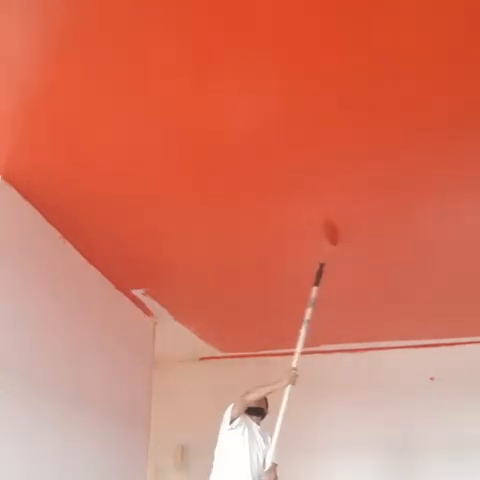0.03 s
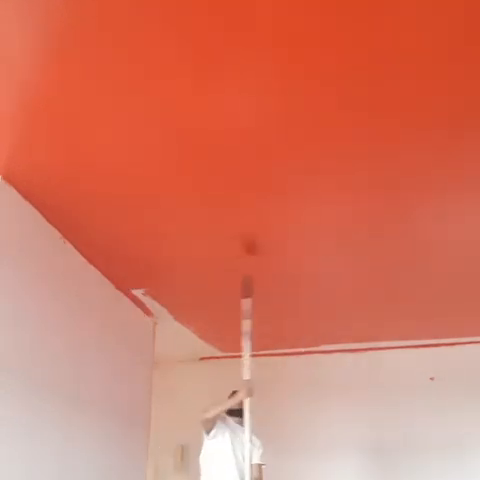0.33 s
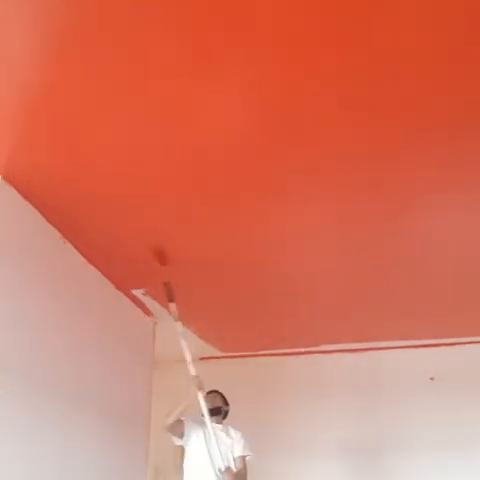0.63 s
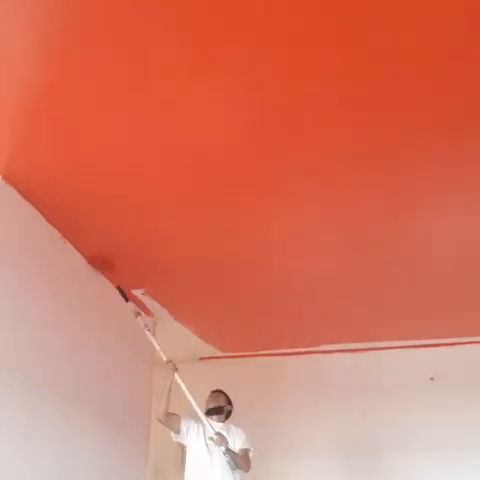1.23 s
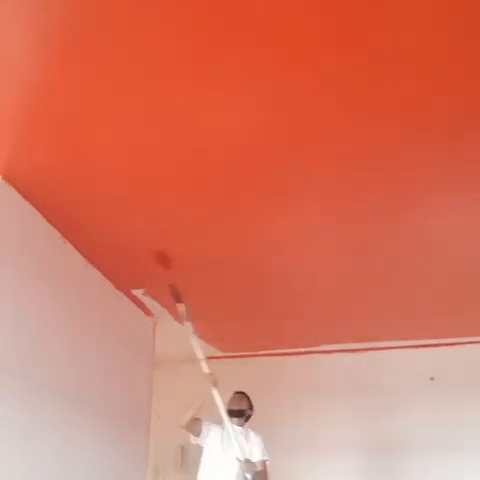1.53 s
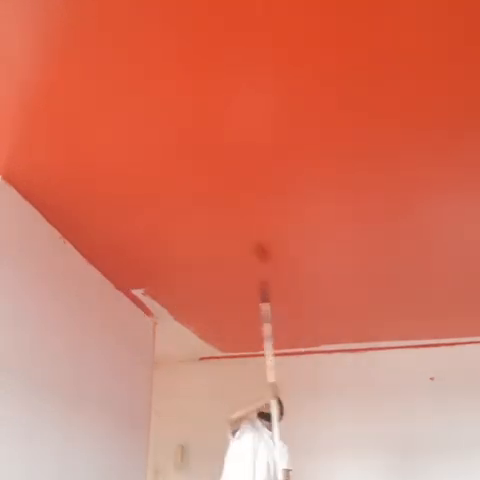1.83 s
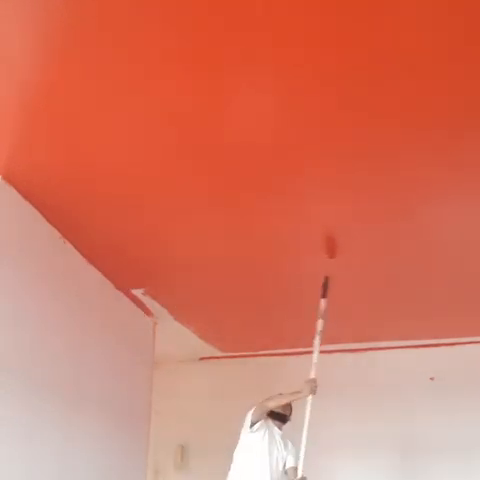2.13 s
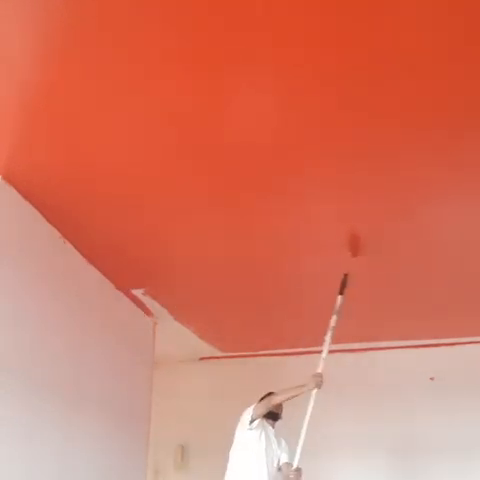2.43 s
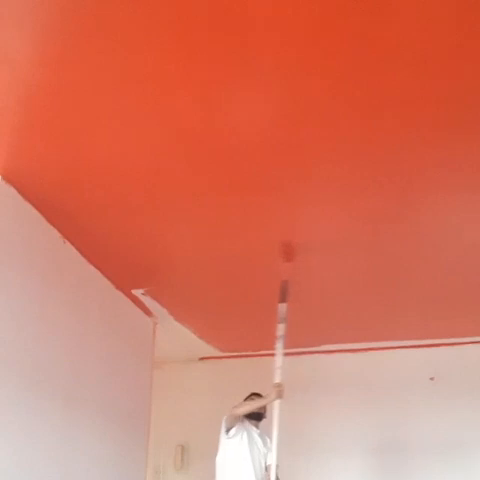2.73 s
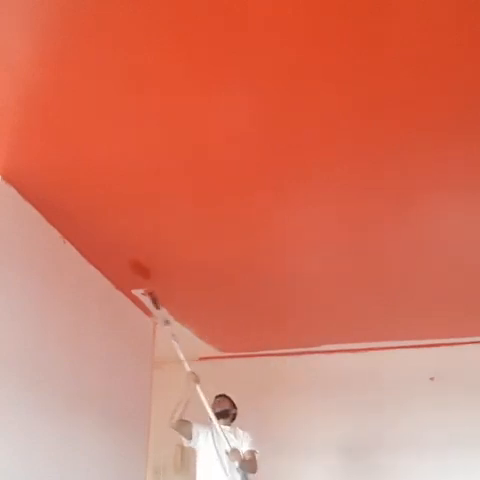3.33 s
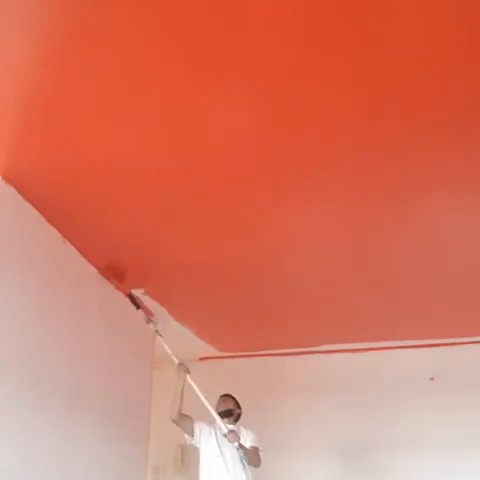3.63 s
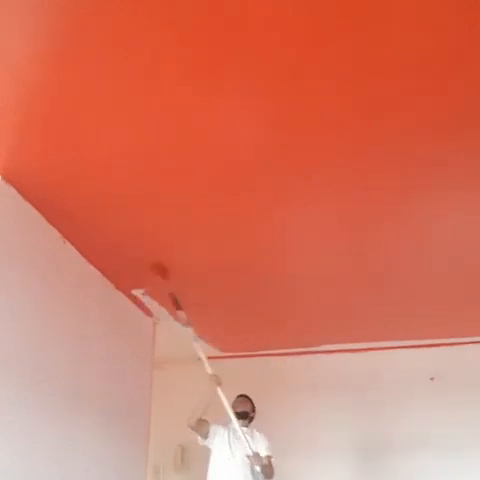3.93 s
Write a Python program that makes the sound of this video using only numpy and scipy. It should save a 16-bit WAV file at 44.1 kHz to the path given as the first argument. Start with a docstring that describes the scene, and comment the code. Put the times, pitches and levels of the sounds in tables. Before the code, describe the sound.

Wet paint roller rolling back and forth, with a sticky hiss and low rumble indoors.

```python
"""Paint roller on a ceiling

A wet roller on a long pole sweeps to and fro in a bare, ringing room. Its nap peels off the
tacky paint in countless tiny snaps that merge into a hiss, and scrubs when pushed hard.
The core rumbles against the ceiling; the pole drones. At each turn the roller sinks, the room rings on."""
import sys
import numpy as np
from scipy import signal
from scipy.fft import rfft, irfft, next_fast_len
from scipy.io import wavfile
from scipy.ndimage import uniform_filter1d, map_coordinates

SR = 44100
rng = np.random.default_rng(int(sys.argv[2]) if len(sys.argv) > 2 else 0)


def unload_audio(sound):
    """Save the sound as a 16-bit wav file, at the path given as the first command line argument."""
    columns = np.transpose(np.atleast_2d(sound))
    # keep every value between -1 and 1, then stretch to whole-number steps
    steps = np.round(np.clip(columns, -1, 1) * 32767)
    wavfile.write(sys.argv[1], SR, steps.astype(np.int16))


N = 176400

# Nap peeling, dips at the turns (time [s], level [dB])
PEEL_LEVEL = [(0, -44.5), (.17, -55.5), (.32, -48.5), (.6, -41.5), (.74, -41), (.92, -43), (1.24, -46.5),
              (1.35, -57.5), (1.5, -56.5), (1.67, -45), (1.8, -46), (1.91, -48), (2.14, -45.5), (2.48, -50),
              (2.64, -61.5), (2.74, -54.5), (2.95, -45), (3.14, -41.5), (3.42, -43.5), (3.57, -43),
              (3.73, -44), (3.85, -55), (4, -60.5)]
# Finest treble, quickest to start and stop (time [s], level [dB])
FIZZ_LEVEL = [(0, -59), (.1, -65), (.16, -72), (.22, -61.5), (.36, -55.5), (.68, -52.5), (1.25, -60),
              (1.35, -71.5), (1.43, -65), (1.56, -63.5), (1.65, -53.5), (1.94, -61), (2.0, -57),
              (2.15, -57), (2.49, -63), (2.63, -73), (2.72, -62), (3.05, -55), (3.19, -55), (3.42, -59),
              (3.59, -54.5), (3.74, -61.5), (3.83, -69.5), (4, -72)]
# Core rolling (time [s], level [dB])
ROLL_LEVEL = [(0, -51), (.12, -56.5), (.28, -59), (.42, -50.5), (.6, -48), (1.14, -56), (1.33, -62.5),
              (1.52, -59.5), (1.79, -48), (2.05, -46), (2.35, -56), (2.6, -66), (2.75, -61), (2.98, -48),
              (3.18, -50.5), (3.4, -53.5), (3.6, -52.5), (3.85, -61.5)]
# Sweeps to the right (start [s], end [s])
RIGHT_SWEEPS = [(-.5, .16), (1.48, 2.4)]
# Hard mid-stroke pushes (peak time [s], level [dB], rise [s], fall [s])
PUSH_PEAKS = [(.66, -43.5, .15, 0.095), (2.04, -45, 0.29, 0.34), (3.07, -45.5, 0.19, 0.18),
              (3.72, -56, 0.063, 0.068)]

# Peeling hiss (frequency [Hz], relative density [dB])
HISS_SPECTRUM = [(400, -31), (900, -22.5), (1250, -7), (1700, -8.5), (2400, -2), (2830, -2), (3700, 0),
                 (4150, 0.7), (5000, -2.5), (5900, -8), (7200, -13), (7800, -22), (8400, -27), (11000, -34)]
# Coarse rub (frequency [Hz], relative density [dB])
RUB_SPECTRUM = [(400, -38), (800, -12.5), (1200, -3.5), (1600, 3.5), (2200, -3.5), (2800, -15.5),
                (4000, -13), (8000, -33)]
# Fine fizz (frequency [Hz], relative density [dB])
FIZZ_SPECTRUM = [(3000, -49), (6000, -2), (7400, -1), (8400, -13), (9300, -8.5), (10300, -6.5), (12000, -7),
                 (14000, -4), (15800, -2.5)]
# Core on plaster (frequency [Hz], relative density [dB])
RUMBLE_SPECTRUM = [(40, -36), (70, -18), (130, -11), (260, -2.5), (400, -1), (495, 1.5), (600, 1), (710, 0),
                   (900, -1), (1250, -5), (2200, -10.5), (3500, -12), (7000, -52)]
# Ring of the hollow core (frequency [Hz], relative density [dB])
HOLLOW_SPECTRUM = [(250, -30), (400, -6), (495, -1), (600, -4), (710, -1), (850, -6.5), (1300, -27)]
# Pole drone (frequency [Hz], relative density [dB])
DRONE_SPECTRUM = [(20, -34), (40, -42), (54, -29), (90, -4.5), (120, -2), (180, -1), (270, -1), (340, -3),
                  (600, -11), (1200, -13.5), (2000, -8), (4000, -31.5)]
# Nap scrubbing (frequency [Hz], relative density [dB])
SCRUB_SPECTRUM = [(400, -22), (800, -5), (1200, 3), (1600, 2.5), (2200, 3), (2800, 2.5), (4000, 0),
                  (5000, -20), (6000, -37), (9000, -40)]

# Low room and ceiling resonances (centre [Hz], width [Hz], relative level [dB])
ROOM_MODES = [(54.7, 3.8, -7.5), (79.4, 5.2, -1), (181, 34, 3.5), (272, 25, -0.5)]
# Room decay (frequency [Hz], T60 [s])
ROOM_T60 = [(60, 1.0), (250, 1.0), (1000, .9), (3000, 0.97), (6000, 0.15), (10000, 0.36), (16000, 0.086)]
# Left-right likeness (frequency [Hz], correlation [-1..1])
PORT_CORRELATION = [(60, 0.95), (200, 0.91), (450, 0.87), (740, 0.87), (1000, 0.16), (1250, -0.51),
                    (2000, 0.095), (3300, 0.12), (6000, 0), (15000, -0.046)]
# Microphone port colour (frequency [Hz], left minus right [dB])
PORT_BALANCE = [(60, .5), (200, 2), (400, 2.3), (750, 1.5), (1200, 3.5), (1800, 2), (2500, 1.2),
                (3400, -4.5), (4400, -7), (5200, -1), (6000, 5.5), (7200, 18), (8500, 4.5), (10400, 1),
                (12500, 3.5), (15500, -8)]

TIME_S = np.arange(-(SR // 2), N) / SR  # starts early so the room already rings


def amp(db):
    return 10 ** (np.asarray(db) / 20)


def unit_rms(x):
    return x / np.sqrt(np.mean(x ** 2) + 1e-20)


def at_hz(table, hz):
    """Table interpolated over log frequency."""
    knots_hz, values = np.transpose(table)
    return np.interp(np.log(hz + 1), np.log(knots_hz + 1), values)


def envelope(table):
    """Table interpolated over time."""
    return np.interp(TIME_S, *np.transpose(table))


def wobble(knots_per_s):
    """Smooth random curve."""
    position = (TIME_S - TIME_S[0]) * knots_per_s
    return map_coordinates(rng.standard_normal(size=1024), [position], mode="wrap")


def filtered(x, response):
    """x through the gain response(hz)."""
    size = next_fast_len(x.shape[-1] + SR // 2)
    gain = response(np.fft.rfftfreq(size, 1 / SR))
    return irfft(rfft(x, size) * gain, size)[..., :x.shape[-1]]


def coloured(x, spectrum):
    """x shaped by a spectrum, rms 1."""
    return unit_rms(filtered(x, lambda hz: amp(at_hz(spectrum, hz))))


def noise():
    """White noise, two independent channels."""
    return rng.standard_normal((2, len(TIME_S)))


def snaps(share, rate_per_s=5000, spread_db=4.5):
    """Paint threads break: dense clicks carry a share of the power, smooth noise the rest."""
    sizes = amp(spread_db * np.clip(noise(), -3, 3)) * np.sign(noise())
    clicks = sizes * (rng.random(sizes.shape) < rate_per_s / SR)
    return np.sqrt(share) * unit_rms(clicks) + np.sqrt(1 - share) * noise()


def nap_peel(turn_s=0.38, lean_left_db=0.5, flutter_db=0.6):
    """Nap peels off the paint: hiss, rub and fizz. Uneven wetness flutters all three."""
    peel_db = envelope(PEEL_LEVEL)
    rub_db = 0.48 * peel_db + 0.52 * envelope(ROLL_LEVEL)
    rightward = sum(1.0 * ((TIME_S > start) & (TIME_S < end)) for start, end in RIGHT_SWEEPS)
    rightward = uniform_filter1d(rightward, int(turn_s * SR))
    fizz_db = envelope(FIZZ_LEVEL) + lean_left_db * np.array([rightward, -rightward])
    hiss = coloured(snaps(share=0.41), HISS_SPECTRUM) * amp(peel_db + 3)
    rub = coloured(snaps(share=0.57), RUB_SPECTRUM) * amp(rub_db - 6.5)
    fizz = coloured(snaps(share=0.45), FIZZ_SPECTRUM) * amp(fizz_db + 8)
    return (hiss + rub + fizz) * amp(flutter_db * wobble(knots_per_s=22))


def core_roll(rough_db=0.25, ring_peak_db=-53.5, ring_db_per_db=1.36):
    """Core rumbles unevenly over the plaster and rings hollowly under the hardest rolling."""
    roll_db = envelope(ROLL_LEVEL)
    rumble = coloured(noise(), RUMBLE_SPECTRUM) * amp(roll_db - 0.5 + rough_db * wobble(knots_per_s=18))
    ring_db = ring_peak_db + ring_db_per_db * (roll_db - roll_db.max())
    return rumble + coloured(noise(), HOLLOW_SPECTRUM) * amp(ring_db)


def roll_swell(mean_db, db_per_db):
    """Gain that follows the rolling about its mean."""
    roll_db = envelope(ROLL_LEVEL)
    return amp(mean_db + db_per_db * (roll_db - roll_db.mean()))


def pole_drone():
    """Pole drones low, swelling slightly with each stroke."""
    return coloured(noise(), DRONE_SPECTRUM) * roll_swell(mean_db=-56, db_per_db=0.15)


def room_modes():
    """Rolling rings the low resonances of room and ceiling."""
    def peaks(hz):
        return sum(amp(db) / np.sqrt(width_hz) / (1 + (2 * (hz - centre_hz) / width_hz) ** 2)
                   for centre_hz, width_hz, db in ROOM_MODES)
    return unit_rms(filtered(noise(), peaks)) * roll_swell(mean_db=-63.5, db_per_db=0.22)


def nap_scrub(flutter_db=0.54):
    """Each push on the pole: a bell-shaped swell of rougher, darker rubbing."""
    push = 0
    for peak_s, level_db, rise_s, fall_s in PUSH_PEAKS:
        sigma_s = np.where(TIME_S < peak_s, rise_s / 2, fall_s / 1.28)
        push += amp(level_db) * np.exp(-0.5 * ((TIME_S - peak_s) / sigma_s) ** 2)
    rubbing = coloured(snaps(share=0.99), SCRUB_SPECTRUM)
    return rubbing * push * amp(flutter_db * wobble(knots_per_s=25.3))


def room_reverb(x, wet_db):
    """Direct sound plus diffuse tail: the room stores each band's energy and lets it decay."""
    hz, frame_s, bands = signal.stft(x, SR, nperseg=512)
    decay = amp(-60 * frame_s[frame_s < 1] / at_hz(ROOM_T60, hz)[:, None]) ** 2
    decay /= decay.sum(axis=1, keepdims=True)
    energy = signal.fftconvolve(np.abs(bands) ** 2, decay[None], axes=2)[..., :len(frame_s)]
    diffuse = signal.stft(noise(), SR, nperseg=512)[2]
    diffuse *= np.sqrt(np.abs(energy) / np.mean(np.abs(diffuse) ** 2))
    tail = signal.istft(diffuse, SR, nperseg=512)[1][:, :x.shape[1]]
    return (x + amp(wet_db) * tail) / np.hypot(1, amp(wet_db))


def wall_reflections(x, count=6, each_db=-21, max_delay_s=0.03):
    """Weak early reflections comb each channel differently."""
    delays_s = max_delay_s * rng.uniform(0.1, 1, (count, 2, 1))
    def comb(hz):
        return 1 + sum(amp(each_db) * np.exp(-2j * np.pi * hz * delay_s) for delay_s in delays_s)
    return filtered(x, comb) / np.sqrt(1 + count * amp(each_db) ** 2)


def scene():
    """Roller and room at two close ports: bass nearly alike, treble nearly unrelated."""
    def mid_side_gains(hz):
        angle_rad = np.arccos(np.clip(at_hz(PORT_CORRELATION, hz), -1, 1)) / 2
        return np.array([np.cos(angle_rad), np.sin(angle_rad)])
    roller = nap_peel() + nap_scrub() + core_roll()
    in_room = wall_reflections(room_reverb(roller, wet_db=-3.5))
    mid, side = filtered(in_room + pole_drone() + room_modes(), mid_side_gains)
    return np.array([mid + side, mid - side])[:, -N:]


def record(dry):
    """Each microphone port adds its own colour; the top treble is cut."""
    def port_gains(hz, cutoff_hz=15850):
        balance_db = at_hz(PORT_BALANCE, hz)
        gain = amp(np.array([balance_db, -balance_db]) / 2)
        return gain / np.sqrt(np.mean(gain ** 2, axis=0)) * (hz < cutoff_hz)
    return filtered(dry, port_gains)


dry = scene()
out = record(dry)
unload_audio(out)
```